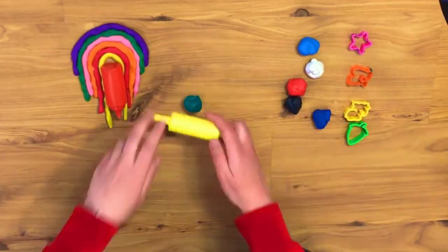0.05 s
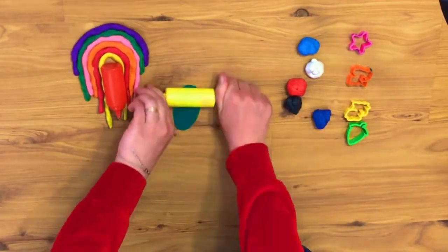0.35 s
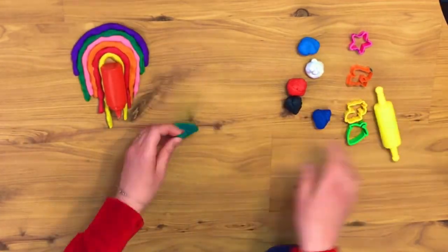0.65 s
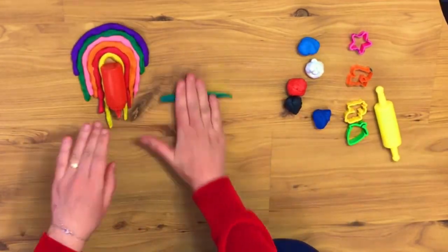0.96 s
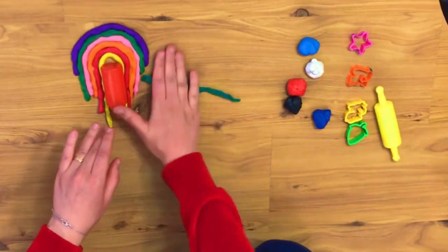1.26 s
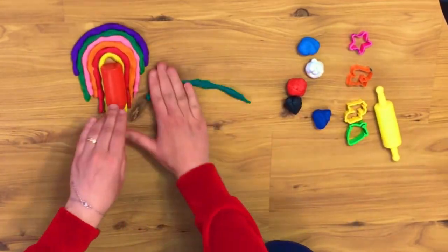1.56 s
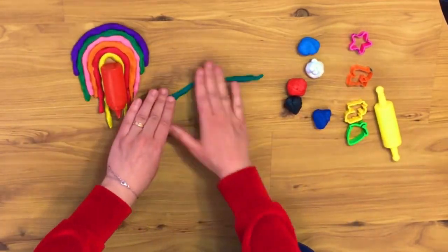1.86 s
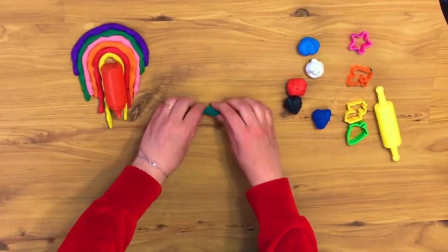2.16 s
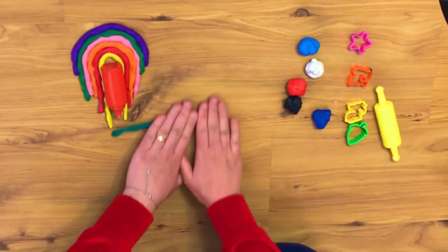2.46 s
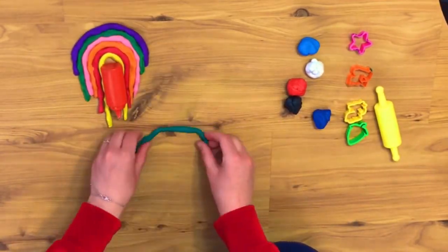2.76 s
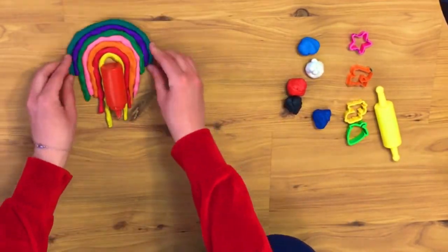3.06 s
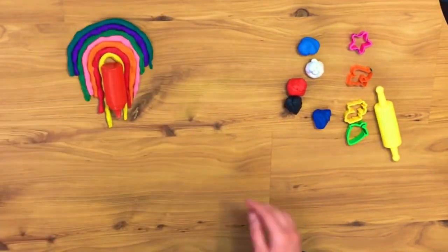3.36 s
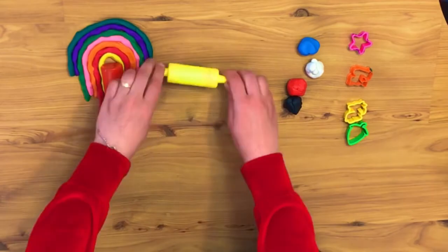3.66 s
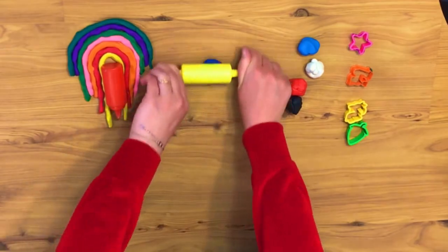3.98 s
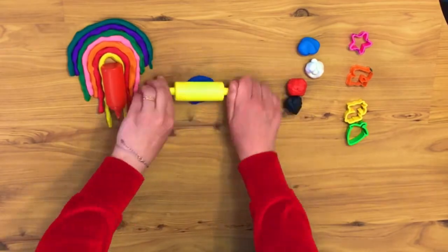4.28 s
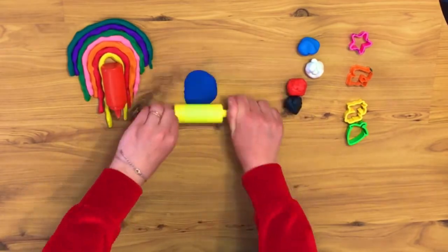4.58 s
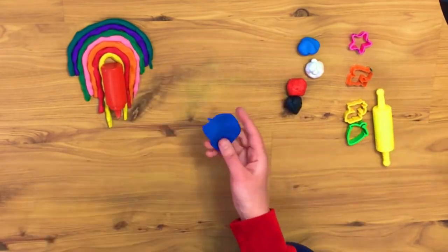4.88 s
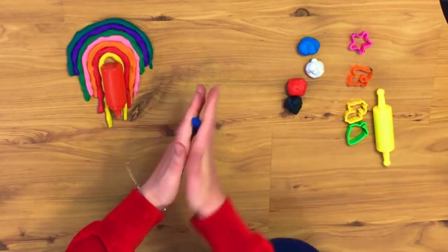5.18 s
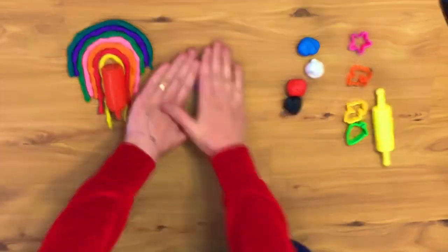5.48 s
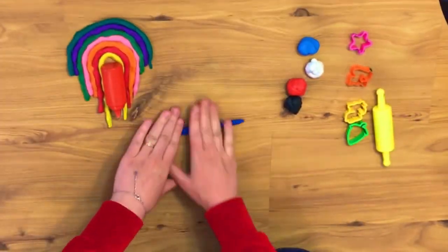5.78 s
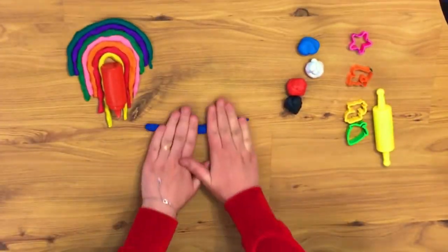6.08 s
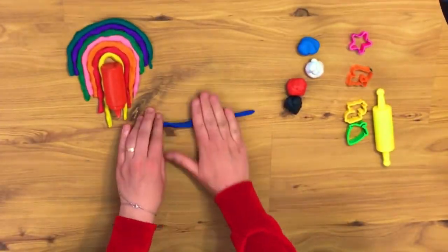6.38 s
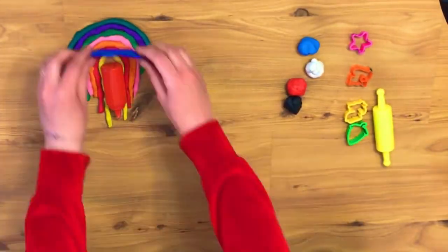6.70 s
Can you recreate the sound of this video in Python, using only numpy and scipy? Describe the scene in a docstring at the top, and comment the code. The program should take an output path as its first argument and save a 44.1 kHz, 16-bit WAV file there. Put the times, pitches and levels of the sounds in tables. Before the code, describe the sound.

Faint clicks and sticky crackle of dough being rolled, then sharp palm pats, rubbing and tiny squeaks over a quiet fan hum.

```python
"""Hands flatten soft dough with a plastic pin and roll it into ropes on a wooden table, in a quiet room.
The pin clicks and tacky dough ticks as it lets go; the palms pat and rub a lump, slap it down,
and skin squeaks on the tabletop. A fan hums behind it all, and a thin whine comes and goes."""
import sys
import numpy as np
from scipy import signal
from scipy.fft import rfft, irfft
from scipy.io import wavfile

SR = 44100
rng = np.random.default_rng(int(sys.argv[2]) if len(sys.argv) > 2 else 0)


def pcm_store(signal):
    """Save signal as 16-bit PCM."""
    levels = np.round(np.clip(np.atleast_2d(signal), -1, 1) * 32767)
    wavfile.write(sys.argv[1], SR, levels.astype(np.int16).T)


N = 301644

# clicks of the pin and of tacky dough: (s, level dB over 10 ms, body dB under 5 kHz, sparkle dB over 10 kHz)
TICKS = [(0.0468, -53, -8, -6), (0.0554, -53, -16, -21), (0.1141, -62, 17, 0), (0.311, -67.5, -1, 2),
         (0.6231, -37, -9, 3), (0.677, -53, 1, 2), (0.6824, -32, -8.5, 4.5), (1.0255, -58, 2, 6),
         (1.0515, -59, -5, -7), (1.081, -65, -1, -7), (1.11, -62.5, 5, 0), (1.1678, -61, 8, 8),
         (1.1989, -56, 1, 3), (1.2147, -55.5, 2, 3), (1.253, -62, 1, 8), (1.269, -60, 6, 7), (1.3214, -56.5, 5, 14),
         (1.3993, -44, -2.5, 6.5), (1.4445, -57.5, -3, -3), (1.5348, -50, 7.5, 12.5), (1.5595, -57, 3, 8.5),
         (1.5893, -53.5, -7, -4), (1.629, -64, 7, 8), (1.6543, -47.5, 3, 20), (1.665, -57, 6, 10), (1.6793, -56, -1, 10),
         (1.6936, -53, 2, 9), (1.7057, -52.5, 16, 15), (1.721, -51, -11, 10), (1.7434, -58, -1, -5), (1.8266, -60, 0, 11),
         (1.8344, -57, -1, 12), (1.8533, -49.5, -9, 9), (1.8794, -59, -4, 11), (2.1773, -53.5, -7, -2),
         (2.1895, -60, -8, -4), (2.4046, -40, 8, 16.5), (2.4485, -52, -11, -5), (2.4744, -58.5, -7, -7),
         (2.489, -62, 14, -8), (2.5397, -56.5, -5, -8), (2.6135, -59, -7, -2), (2.623, -49.5, -5.5, -6),
         (2.634, -60, -5, -7), (2.977, -65.5, 4, -14), (3.241, -57.5, 0, -8), (3.2544, -59, -3, -20),
         (3.3277, -53, -10, -6), (3.3387, -54, 4, -15), (3.3441, -47.5, 0.5, -6), (3.601, -59, 4, -7),
         (3.6453, -51, -21, -4), (3.6556, -39, -14, -3.5), (3.7155, -55, 9, -8), (3.769, -45, 3.5, 10),
         (3.7978, -51, 9, 2), (4.0968, -56, 3, 10), (4.1342, -39.5, -4.5, 4.5), (4.2419, -61, 4, 0), (4.254, -51, -5, 0),
         (4.3057, -60, 7, 6), (4.5074, -65, 8, 14), (4.5744, -60, -7, -3), (4.6994, -40.5, -11, 0),
         (4.9768, -61, 23, -6), (4.9929, -58, 16, -16), (5.0249, -45, 3.5, -9), (5.0313, -41.5, 1, -5),
         (5.4238, -55.5, 11, 4), (5.435, -50, 11, -2), (5.454, -49, 24, -6), (5.857, -56, 7, -12), (5.8686, -59, 17, -1),
         (5.935, -55.5, 7, 0), (6.1678, -58, 4, 0), (6.2503, -52.5, -5, -6), (6.267, -59.5, -8, 10),
         (6.2805, -50, -8, -6), (6.3193, -60, 2, 4), (6.512, -62, -2.5, -14), (6.663, -64.5, -7, -24),
         (6.7809, -58, -2.5, -15)]
TICK_COLOUR = [(300, -24), (1500, -25.5), (3000, -8), (4500, -4.5), (5600, -3), (6700, 3.5), (8500, -1), (9300, -0.5), (11000, 1.5), (13000, -3), (15500, -5)]  # (Hz, dB)
# pats of the hands on dough: (s, level dB over 10 ms, pitch of the trapped air Hz, its ring dB, low thud dB)
PATS = [(0.517, -62.5, 2700, -10, 9), (1.9405, -57, 4230, -1, 19), (2.027, -67, 4300, -3, 5), (3.054, -62, 2680, 0, 9), (4.5205, -54.5, 3000, -2, 8), (4.964, -58, 2850, -2, 10),
        (5.1004, -25, 3396, -3.5, -14), (5.4446, -32, 3250, -7.5, -0.5), (5.4530, -54, 3230, -1.5, 0.5), (5.5173, -21, 3180, -7.5, 2.5), (5.5590, -40, 3220, -9, 6.5)]
PAT_COLOUR = [(200, -29), (340, -38.5), (480, -11.5), (600, -13.5), (1020, -2), (1280, -19.5), (1620, 3), (2050, -11.5), (2700, 8), (4000, -1), (4900, 3), (6000, -5), (7800, 2), (12500, -8.5)]  # (Hz, dB)
# the table rings under the hands as they land: (Hz, dB, t60 s)
TABLE = [(510, -16, 0.12), (562, 0.5, .22), (650, -2, .1), (730, 4, 0.16), (1010, 1, .07), (1540, -6, 0.064), (3400, -8, .09)]
LANDINGS = [(1.942, -66), (5.518, -44.5)]  # (s, dB)
# skin sticking and slipping on the tabletop, one table a squeak: (s, pitch Hz, level dB, second partial against the first dB)
SQUEAKS = [
    [(5.707, 3360, -52, -15), (5.715, 3350, -45.5, -12), (5.73, 3310, -64, 0)],
    [(5.734, 3180, -53, -3), (5.742, 3380, -49, -4), (5.748, 3060, -50, -8)],
    [(5.752, 3210, -56, -3), (5.76, 3140, -48, 0.5), (5.77, 3020, -59, -3)],
    [(5.802, 3210, -54, -7), (5.812, 3380, -48.5, 4), (5.832, 2780, -53.5, -12), (5.834, 2761, -60, -10)],
    [(5.985, 3100, -57, -1), (5.991, 3110, -45.5, 0), (5.998, 3059, -56, -6)],
    [(6.001, 3064, -51, -7), (6.009, 3040, -46, -11), (6.016, 3030, -53, -2)],
    [(6.032, 3130, -51, 7), (6.046, 3100, -47.5, -9.5), (6.056, 3040, -48.5, -5), (6.069, 2859, -62, -5)],
    [(6.3, 3300, -68, -12), (6.306, 3370, -53, -16), (6.312, 3470, -63, -16)],
    [(6.356, 3150, -67, -2), (6.362, 3060, -57, 1), (6.368, 3090, -62, -5)],
    [(6.373, 3200, -55, 3), (6.381, 3100, -58, 4.5), (6.39, 3000, -58, -13)],
    [(6.439, 3180, -66, -4), (6.447, 3080, -52, -6.5), (6.454, 3020, -59, -11)],
]
# palms sliding on each other: (s, level dB)
RUB = [(4.85, -79), (4.996, -56), (5.014, -95), (5.024, -46), (5.076, -93), (5.102, -43), (5.142, -71.5),
       (5.438, -52), (5.444, -21), (5.498, -58), (5.518, -22), (5.534, -49), (5.556, -43), (5.62, -89)]
RUB_COLOUR = [(700, -18), (1300, -20), (1650, -8), (2100, -12), (2800, -4.5), (3250, 0.5), (3800, -7), (4900, -5.5), (6200, -16), (8000, -9), (11000, -16.5), (15500, -15)]  # (Hz, dB)
# dough peeling from skin and wood as it rolls: (s, level dB)
PEEL = [(0, -74.5), (.55, -75), (.85, -71.5), (1.05, -69), (1.3, -68), (1.5, -69), (1.7, -68.5), (1.88, -61.5), (2.0, -75), (2.15, -72), (2.35, -78), (2.47, -69), (2.68, -60), (2.76, -71), (2.85, -67), (3.05, -82), (3.3, -72), (3.95, -77.5), (4.3, -71), (4.42, -68.5), (4.6, -68), (4.8, -72.5), (5.6, -72.5), (5.75, -60), (5.95, -65.5), (6.1, -69), (6.35, -60), (6.47, -75), (6.7, -61), (6.84, -81.5)]
# steady air of the room: (Hz, dB)
AIR = [(30, -0.5), (150, 1), (335, 3.5), (460, 12), (505, -0.5), (760, 3), (1100, 3.5), (1240, -3), (2600, -2.5), (4500, -9.5), (9000, -13.5), (16000, -17)]
AIR_DB = -64.5
# resonances of the fan: (Hz, width Hz, level dB)
FAN = [(572.2, 15.3, -68.5), (687, 28, -79), (849, 17, -70.5), (1040, 28, -77), (1660, 91, -78.5)]
# a thin electrical whine: (s, level dB)
WHINE, WHINE_HZ = [(0, -87), (1.9, -83.5), (2.7, -76.5), (2.95, -73), (3.8, -72), (5.5, -70.5), (5.74, -70.5), (5.79, -100)], 2332
EDGE_HZ = 16100  # fixed
# bounces off the tabletop and the arms: (delay s, dB)
ECHOES = [(.0032, -11.5), (.0042, -15.5), (.0055, -16.5)]
# strokes of palm over palm and dough: (s, length s, level dB, sparkle dB over 6 kHz)
RUBS = [(0.461, 0.067, -67, 3), (3.3, 0.073, -71, 6), (3.431, 0.1, -74.5, 5), (4.861, .13, -69.5, 0), (5.088, 0.029, -51.5, -7), (5.114, 0.034, -67, 1), (5.161, 0.042, -62, 2.5), (5.202, 0.063, -62, -0.5), (5.305, 0.062, -61, -6),
        (5.37, 0.019, -48, 2), (5.384, 0.036, -52, 3.5), (5.455, 0.047, -52, -4.5), (5.503, .022, -47.5, -4), (5.522, 0.03, -48, -1.5), (5.562, 0.042, -62.5, 1), (5.851, 0.14, -67, 8), (6.119, 0.1, -70, 11), (6.797, 0.043, -69, -4)]
LOW_CUT = [(200, -27.5), (265, -23.5), (305, -13.5), (335, -0.5)]  # of the microphone: (Hz, dB)
# air pocket between hand and dough: (factor on its pitch, dB, t60 s)
POCKET = [(0.99, -2.5, 0.031), (0.821, -12.5, 0.046)]
OVERTONES = [(2, -0.5), (3, -7), (4, -17), (5, -11.5)]  # (multiple, dB)


def gain_of(db):
    """Decibels to gain."""
    return 10 ** (np.asarray(db) / 20)


def evened(x):
    """Scales to an rms of 1."""
    return x / np.sqrt(np.mean(x ** 2) + 1e-20)


def read(points, hz):
    """A spectrum in dB, joined by straight lines on a log-frequency axis."""
    f, db = np.transpose(points)
    return np.interp(np.log(hz + 1), np.log(f), db)


def follow(curve):
    """The gain of a level curve at every sample."""
    return gain_of(np.interp(np.arange(N) / SR, *np.transpose(curve)))


def add(mix, s, sound):
    """Mixes a sound in at a time."""
    part = mix[max(round(s * SR), 0):][:len(sound)]
    part += sound[:len(part)]


def noise(shape, size=N):
    """Noise of rms 1 whose gain over frequency is shape(Hz)."""
    return evened(irfft(rfft(rng.standard_normal(size)) * shape(np.fft.rfftfreq(size, 1 / SR)), size))


def colour(x, shape, size=2048):
    """Causal filter whose dB over frequency is shape(Hz), so that attacks stay sharp."""
    log_gain = np.log(gain_of(shape(abs(np.fft.fftfreq(size, 1 / SR)))))
    taps = np.fft.ifft(np.exp(np.conj(signal.hilbert(log_gain)))).real
    return signal.fftconvolve(x, taps[:size // 2])[:len(x)]


def snap(scatter_db, t60, echo_db, room_db, room_t60, size=6000):
    """One sharp contact, its first bounces, scatter from hands and things near by, and a faint room."""
    t = np.arange(size) / SR
    near, far = rng.standard_normal((2, size)) * gain_of(-60 * t / np.array([[t60], [room_t60]]))
    x = gain_of(scatter_db) * near / np.linalg.norm(near) + gain_of(room_db) * far / np.linalg.norm(far)
    x[0] = 1
    for delay, db in ECHOES:
        add(x, delay, gain_of([db + echo_db]))
    return x


def ticks(level_db=1):
    """Tiny contacts: the plastic pin gives more body, parting dough more sparkle."""
    out = np.zeros(N)
    for s, db, body_db, sparkle_db in TICKS:
        x = snap(scatter_db=0.5, t60=0.03, echo_db=-0.5, room_db=-23, room_t60=.14)
        sparkle = lambda f: sparkle_db * (shelf(f, 9900) - .5 * shelf(f, 17000))
        x = colour(x, lambda f: read(TICK_COLOUR, f) + body_db * (1 - shelf(f, 5000)) + sparkle(f))
        add(out, s, at_level(x, db + level_db))
    return out


def pats(level_db=0):
    """A palm meets the dough with a snap, and the pocket of air under it rings for a few milliseconds."""
    out = np.zeros(N)
    for s, db, hz, ring_db, thud_db in PATS:
        x = snap(scatter_db=7.5, t60=0.022, echo_db=-13, room_db=-19, room_t60=.14)
        x = colour(x, lambda f: read(PAT_COLOUR, f) + thud_db * (1 - shelf(f, 1100)))
        t = np.arange(len(x)) / SR
        ring = sum(gain_of(mode_db - 60 * t / t60) * np.sin(2 * np.pi * hz * factor * t) for factor, mode_db, t60 in POCKET)
        add(out, s, at_level(x + .5 * gain_of(ring_db) * ring, db + level_db))
    return out


def knock():
    """The wooden top rings briefly as the hands come down."""
    out, t = np.zeros(N), np.arange(SR // 2) / SR
    ring = sum(gain_of(db - 60 * t / t60) * np.sin(2 * np.pi * hz * t) for hz, db, t60 in TABLE)
    for s, db in LANDINGS:
        add(out, s, gain_of(db) * ring * (1 - np.exp(-t / 0.0042)))  # soft flesh starts it gently
    return out


def squeaks(level_db=0, shimmer_db=1.3, scrape_db=-20):
    """Stick and slip, some three thousand times a second; the pitch sags as the hand slows."""
    out, jitter = np.zeros(N), .022  # fixed
    for rows in SQUEAKS:
        s, *columns = np.transpose(rows)
        t = np.arange(s[0] - .001, s[-1] + 0.0012, 1 / SR)
        hz, db, bite_db = (np.interp(t, s, c) for c in columns)
        waver, grip = (noise(lambda f: 1 / (1 + (f / 900) ** 2), size=len(t)) for _ in range(2))
        phase = 2 * np.pi * np.cumsum(hz * (1 + jitter * waver)) / SR
        tone = np.sin(phase) + sum(gain_of(bite_db + partial_db) * np.sin(round(k) * phase) for k, partial_db in OVERTONES)
        # now and then the skin lets go out of turn
        scrape = evened(colour(grains(per_s=1000, spread_db=7.5, size=len(t)), lambda f: read(TICK_COLOUR, f)))
        swell = gain_of(level_db + db + shimmer_db * grip) * signal.windows.tukey(len(t), .3)
        add(out, t[0], swell * (np.sqrt(2) * tone + gain_of(scrape_db) * scrape))
    return out


def grains(per_s, spread_db, size=N):
    """A random train of tiny slips, most small and a few large."""
    return (rng.random(size) < per_s / SR) * rng.choice([-1, 1], size) * gain_of(spread_db * np.minimum(rng.exponential(1, size), 3))


def rub(level_db=-2, most_db=-50):
    """Dense slips of skin on skin, up to the level of a firm stroke."""
    slips = colour(grains(per_s=6000, spread_db=3.5), lambda f: read(RUB_COLOUR, f))
    return gain_of(level_db) * np.minimum(follow(RUB), gain_of(most_db)) * evened(slips)


def peel(level_db=-2):
    """Fine crackle of tacky dough between the louder ticks."""
    spread = snap(scatter_db=0, t60=0.012, echo_db=-2, room_db=-12, room_t60=.14)
    pops = grains(per_s=130, spread_db=4.5)  # fixed
    crackle = signal.fftconvolve(pops, spread)[:N]
    return gain_of(level_db) * follow(PEEL) * evened(colour(crackle, lambda f: read(TICK_COLOUR, f)))


def room(air_db=-1.0):
    """Moving air, the fan's narrow resonances and the whine."""
    air = gain_of(AIR_DB + air_db) * noise(lambda f: gain_of(read(AIR, f)))
    fan = sum(gain_of(db) * noise(lambda f: 1 / (1 + ((f - hz) / width) ** 2)) for hz, width, db in FAN)
    whine = np.sqrt(2) * follow(WHINE) * np.sin(2 * np.pi * WHINE_HZ * np.arange(N) / SR)
    return air + fan + whine


def at_level(x, db):
    """Scales a short sound so that its energy, spread over 10 ms, has this level."""
    return gain_of(db) * x / np.sqrt(np.sum(x ** 2) / (SR * .01))  # fixed


def shelf(f, hz):
    """Rises from 0 below hz to 1 above it."""
    return 1 - 1 / (1 + (f / hz) ** 8)  # fixed


def rubs():
    """Each stroke is a dense run of slips that swells quickly and fades."""
    out = np.zeros(N)
    for s, length, db, sparkle_db in RUBS:
        u = np.linspace(0, 1, round(length * SR))
        slips = colour(grains(per_s=5000, spread_db=2.5, size=len(u)), lambda f: read(RUB_COLOUR, f) + sparkle_db * shelf(f, 6000))
        add(out, s, gain_of(db) * evened(slips * abs(np.sin(np.pi * u ** 0.98)) ** 0.57))
    return out


def scene():
    """Everything reaches one microphone above the table."""
    return (ticks() + pats() + knock() + squeaks() + rubs() + peel() + room())[None]


def record(dry):
    """The microphone's low cut, then the recorder's band limit."""
    thin = colour(dry[0], lambda f: read(LOW_CUT, f), size=8192)
    return signal.oaconvolve(thin, signal.firwin(201, EDGE_HZ, window=("kaiser", 8), fs=SR), "same")[None]


dry = scene()
out = record(dry)
pcm_store(out)
```